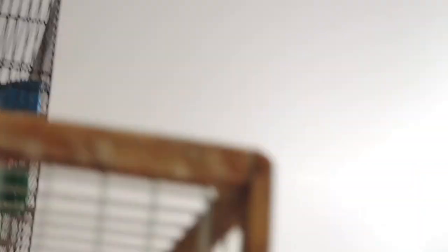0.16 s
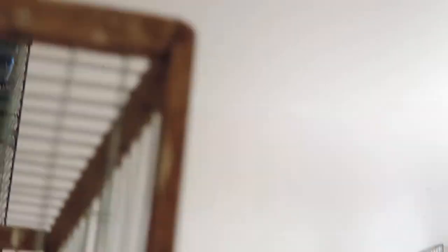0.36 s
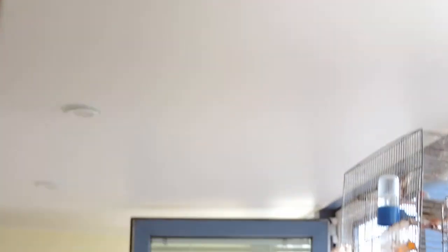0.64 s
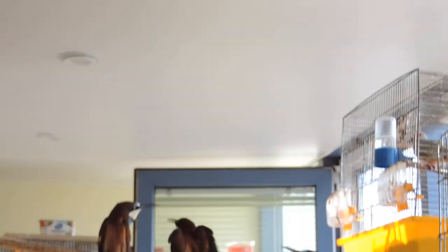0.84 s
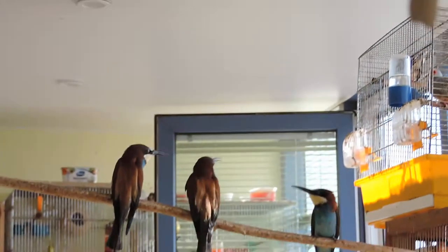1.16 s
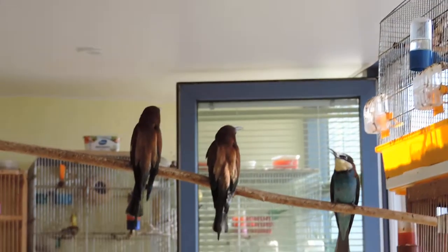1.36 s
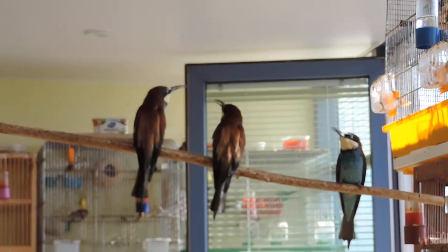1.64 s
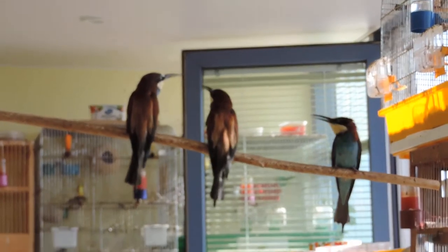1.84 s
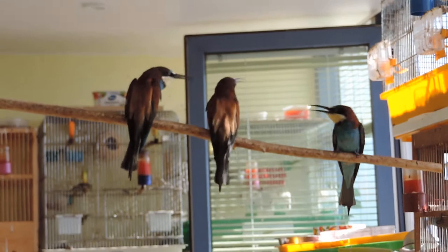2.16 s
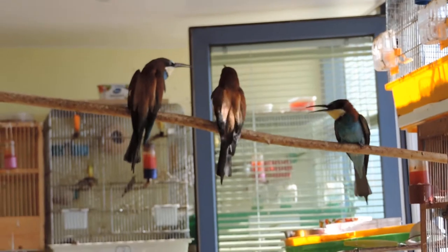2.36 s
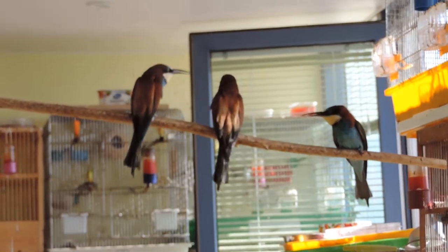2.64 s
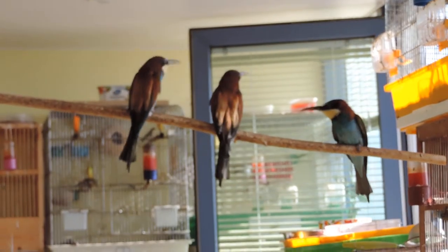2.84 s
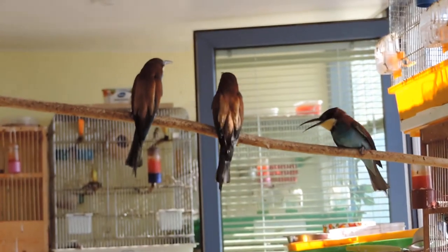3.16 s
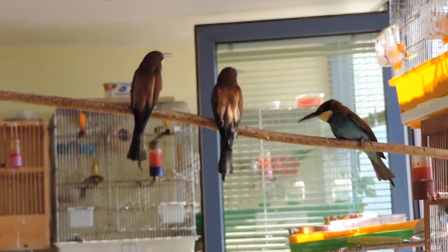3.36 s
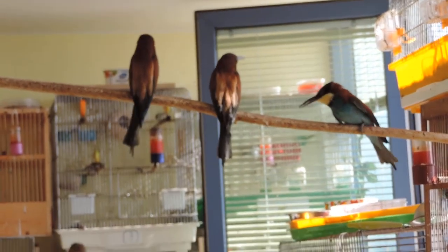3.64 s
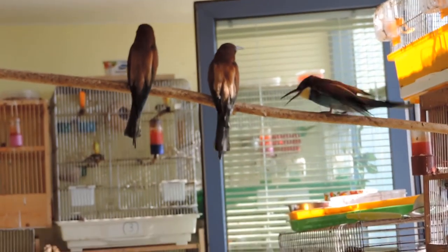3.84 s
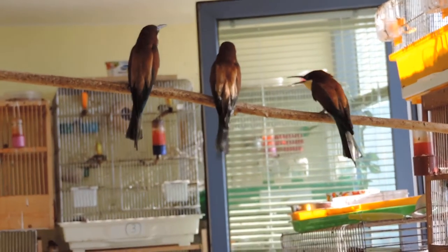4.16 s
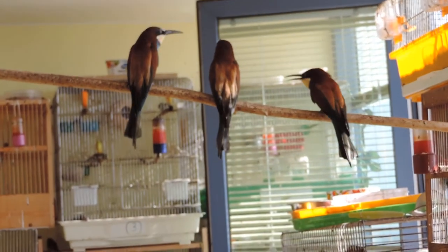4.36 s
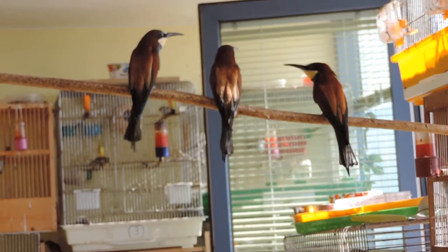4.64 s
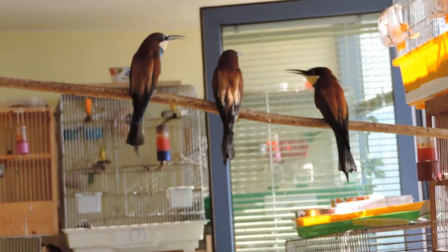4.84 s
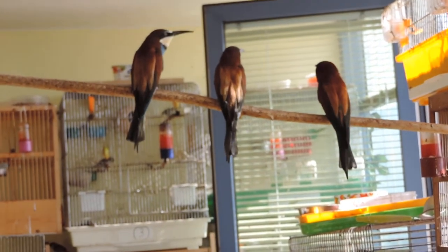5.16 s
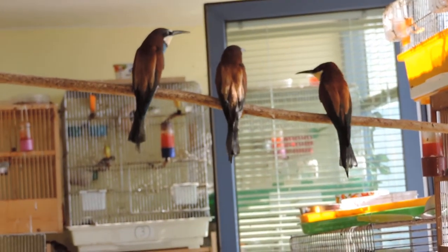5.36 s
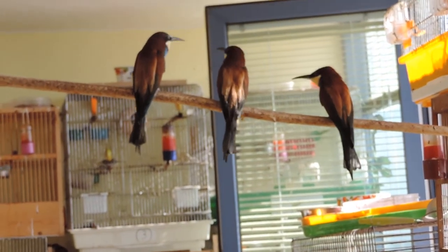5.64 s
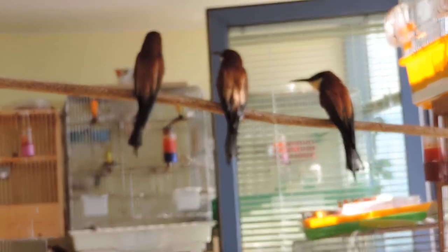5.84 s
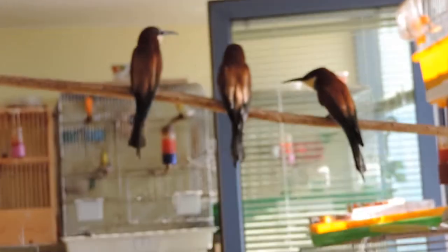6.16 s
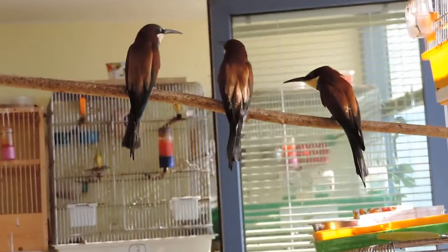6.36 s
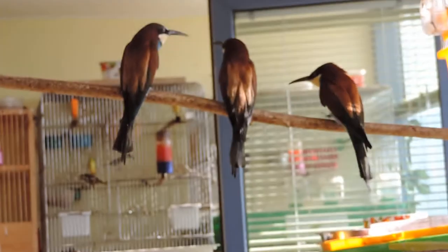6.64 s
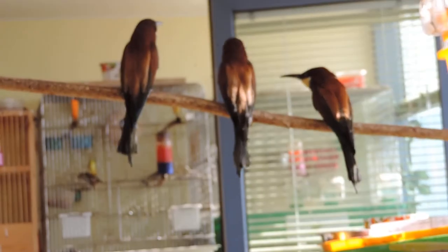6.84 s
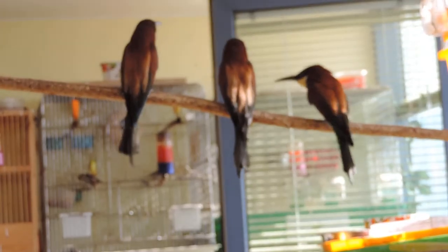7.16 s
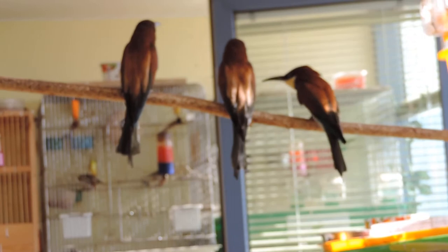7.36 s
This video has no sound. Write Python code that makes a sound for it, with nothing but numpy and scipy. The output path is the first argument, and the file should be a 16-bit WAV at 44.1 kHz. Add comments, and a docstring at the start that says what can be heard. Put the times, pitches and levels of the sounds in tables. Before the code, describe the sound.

Several bee-eaters call close by in a small, lightly echoing room. Short, throaty rolled "prrup" notes run throughout, mixed with quick upward chatter and small pips, densest in the first four seconds. Low soft purrs slip between them. Fainter caged birds chip and whistle thinly to the left, over steady ventilation. Calls grow sparser later, with a brief chatter burst near the end. Stereo microphones in the room.

```python
"""Rolling "prrup" calls of bee-eaters on a perch in a small bird room, mixed with rising chatter and low purrs.
Calls are two beating voices with a rasp, chatter is gliding tones, purrs are throbbing tones. Caged birds
whistle, buzz and chip (gliding sines); wing flutter and wire ticks are shaped noise. Scattered reflections give
a short room tail, over ventilation: filtered noise with low resonances."""
import sys
import numpy as np
from scipy import signal
from scipy.fft import rfft, irfft
from scipy.io import wavfile

SR = 44100
rng = np.random.default_rng(int(sys.argv[2]) if len(sys.argv) > 2 else 0)


def dump_mix(stems):
    """Bounce the given channels to the path in sys.argv[1] as a 16-bit WAV at rate SR."""
    frames = np.atleast_2d(stems).T  # one column per channel
    limited = np.clip(frames, -1, 1)  # hard clip at full scale
    pcm = np.round(limited * 32767).astype(np.int16)
    wavfile.write(sys.argv[1], SR, pcm)


N = 331191

# Levels are relative: mix gains follow.
# rolling calls: start_s, length_s, lower_voice_base_hz, level_db
ROLL_CALLS = [(.04, 0.076, 1982, -27.5), (0.238, 0.097, 1950, -31), (0.355, 0.077, 1970, -27),
              (0.601, 0.079, 2010, -26.5), (0.685, 0.099, 1945, -27.5), (0.792, 0.097, 1917, -24),
              (1.218, 0.087, 1932, -27), (1.288, 0.072, 1979, -26), (1.461, 0.08, 1945, -28),
              (1.524, .11, 1989, -28), (1.646, 0.1, 1853, -31), (1.924, 0.062, 1857, -29),
              (1.966, .08, 2014, -27.5), (2.195, 0.09, 1979, -28), (2.275, 0.078, 1920, -31),
              (2.433, .085, 1845, -30.5), (2.746, 0.09, 1912, -25.5), (2.825, 0.08, 2022, -25),
              (2.896, 0.11, 1887, -26), (3.013, .11, 1890, -26.5), (3.334, .12, 1894, -26),
              (3.523, .12, 1879, -26), (3.892, 0.11, 1895, -28.5), (3.979, .075, 1872, -30.5),
              (4.164, .11, 1782, -26.5), (4.527, 0.08, 1997, -25.5), (4.836, 0.12, 1945, -25.5),
              (4.996, .081, 1852, -31.5), (5.23, .11, 1923, -29), (5.842, .11, 1881, -27.5),
              (6.006, .11, 1918, -28), (6.306, .11, 1718, -32.5), (6.55, 0.075, 1980, -26),
              (6.993, 0.076, 1840, -32.5), (7.115, .125, 1910, -30), (7.356, .11, 1732, -29)]
# upper voice over lower, before its fade: call_base_hz, upper_over_lower_db
VOICE_BALANCE = [(1690, 1.5), (1880, -1.5), (1950, -9), (2010, -12)]
# rising chatter notes: start_s, length_s, level_db
CHATTER_NOTES = [(0.922, .039, -21), (0.975, .06, -25), (1.067, .059, -27.5), (1.142, 0.055, -26.5),
                 (1.333, .025, -20), (1.416, 0.038, -29), (1.574, 0.038, -26), (1.759, 0.044, -30),
                 (1.829, .055, -26.5), (2.008, .039, -25), (2.082, 0.065, -27), (2.273, .041, -22),
                 (2.391, 0.029, -31), (2.478, .03, -29), (2.568, 0.033, -29), (2.658, .065, -24),
                 (3.103, 0.025, -31), (3.195, .03, -32), (3.27, 0.046, -31), (3.644, .05, -22),
                 (3.739, 0.027, -31.5), (3.828, 0.0277, -37), (4.098, .048, -29), (6.777, .072, -22),
                 (6.864, .056, -21)]
# slightly falling pips of a second bird: start_s, level_db
PIP_NOTES = [(1.014, -24.5), (1.086, -24.5), (1.176, -19.5), (1.714, -29.5), (2.165, -30), (2.33, -51),
             (2.405, -27.5), (2.51, -27), (2.546, -40), (2.6, -26.5), (3.16, -36), (4.3, -28.5),
             (4.372, -30), (6.761, -36)]
# how hard the chattering bird pushes: time_s, effort_db
CHATTER_EFFORT = [(.9, -14.5), (1.15, -10), (1.4, -9.5), (1.6, -2), (1.76, -10.5), (2.02, -2), (2.55, -1),
                  (2.67, -15), (3.1, 0.5), (3.83, -3.5), (4.1, -0.5), (6.8, -7.5)]
# overtone colour of calls and chatter: freq_hz, gain_db
RASP_COLOUR = [(2400, -39), (3000, 6.5), (3800, -2.5), (4800, 1), (6300, -2), (7500, -9.5), (9500, -4.5),
               (12000, -0.5), (13300, 0), (14200, -20)]
# low throbbing purrs: start_s, length_s, first_pitch_hz, last_pitch_hz, level_db
PURR_NOTES = [(0.398, .054, 1370, 1375, -37.5), (1.706, 0.07, 1452, 1432, -39.5),
              (2.531, 0.072, 1480, 1444, -40), (3.078, 0.12, 1350, 1366, -47),
              (3.791, 0.12, 1630, 1725, -42), (4.287, .092, 1577, 1383, -33.5),
              (4.615, 0.039, 1413, 1420, -40), (4.674, 0.137, 1493, 1628, -34),
              (5.586, 0.085, 1426, 1492, -39.5), (5.669, .1, 1594, 1440, -35.5),
              (6.453, 0.076, 1405, 1355, -38)]
# caged-bird notes: start_s, length_s, first_pitch_hz, last_pitch_hz, buzz_share_of_pitch, level_db
TWEET_NOTES = [(0.398, 0.13, 6040, 5350, 0.13, -71), (1.604, 0.066, 4630, 5650, 0.097, -57),
               (2.364, 0.085, 4860, 4200, .012, -52), (2.649, 0.074, 3440, 3482, 0.0095, -46),
               (2.794, .07, 4910, 4490, .012, -50.5), (2.877, 0.0267, 4700, 5400, 0.0094, -51),
               (3.144, 0.16, 2800, 2604, 0.045, -53.5), (3.113, 0.0316, 6440, 5900, .036, -57),
               (3.154, 0.035, 3620, 3836, .006, -42.5), (3.743, 0.02, 2750, 2700, .03, -46.5),
               (3.8, 0.014, 3380, 3460, .02, -49), (3.994, 0.034, 4830, 4930, 0.084, -56.5),
               (4.094, 0.022, 3600, 3290, 0.063, -46), (4.192, 0.059, 7360, 7280, .006, -53),
               (4.768, .06, 5210, 4840, .006, -58), (4.828, 0.045, 6320, 5260, 0.011, -47),
               (4.992, 0.094, 4340, 4200, 0.058, -60.5), (5.116, 0.058, 4440, 6700, 0.089, -59),
               (5.336, .17, 5680, 4040, .1, -60.5), (5.646, 0.071, 7230, 7060, 0.029, -53.5),
               (5.803, .12, 6470, 5110, 0.14, -69), (6.016, 0.052, 4190, 6180, .034, -56.5),
               (6.16, 0.24, 4290, 4520, .015, -73), (6.418, 0.063, 5190, 5380, .008, -62.5),
               (6.508, 0.033, 5410, 5720, 0.029, -51.5), (6.514, 0.016, 6570, 7000, 0.021, -61),
               (6.667, 0.13, 8980, 9130, .022, -58.5), (7.307, 0.062, 3960, 5820, 0.07, -56.5)]
# centre of the random chip level of the far cages: time_s, level_db
TWITTER_LEVEL = [(0, -95.5), (1.35, -73), (1.47, -54.5), (1.9, -62), (2.3, -52), (3.2, -56.5),
                 (3.45, -61.5), (3.9, -50), (4.6, -73.5), (5.4, -72), (6.2, -101), (6.5, -61), (7.5, -77)]
# grainy noise puffs of wing flutter: start_s, length_s, level_db
NOISE_PUFFS = [(.342, 0.055, -54), (.843, 0.075, -54), (3.084, 0.028, -43), (3.779, 0.06, -48),
               (4.01, 0.13, -49), (4.114, .065, -37.5), (4.199, 0.28, -49.5), (4.36, 0.12, -50),
               (4.44, 0.31, -50.5)]
# puff noise colour: freq_hz, gain_db
PUFF_COLOUR = [(800, -4.5), (2000, 2.5), (3500, 8.5), (5000, 5), (7500, -12.5), (12500, -11), (14200, -21)]
# ticks on the cage wire: start_s, level_db
WIRE_TICKS = [(0.464, -31), (0.7724, -25), (6.7624, -55)]
# wire colour: freq_hz, gain_db
WIRE_COLOUR = [(1500, -15), (4000, -32), (7000, -13), (10000, 0.5), (13000, -4.5), (15500, -29)]
# moving-air colour: freq_hz, gain_db
AIR_COLOUR = [(12, -56), (20, 3.5), (157, -0.5), (324, -3.5), (932, -3), (1410, -2.5), (2330, -13.5),
              (2920, -21.5), (4430, -25.5), (6720, -34), (7310, -37), (8880, -28.5), (9660, -40.5),
              (13100, -30.5), (15500, -62.5)]
# background strength about its mean row: time_s, level_db
AIR_SWELL = [(0, 5), (1.2, 6), (1.8, 3.5), (2.4, 2.5), (2.8, 6.5), (3.6, 2), (4.3, 5.5), (5.2, 2.5),
             (7.5, 2.5)]
# fan hum resonances: centre_hz, width_hz, level_db
FAN_HUM = [(24.6, 8, -56), (131.3, 19, -58), (143, 18, -65.5), (228.7, 28.7, -53.5)]
# room decay: freq_hz, t60_s
ROOM_DECAY = [(500, 0.12), (2000, 0.2), (5000, 0.23), (9000, 0.29), (15000, 0.055)]
# left-right likeness of diffuse sound: freq_hz, correlation
LIKENESS = [(25, 0.83), (200, 0.98), (600, 0.97), (1200, 0.78), (2000, 0.56), (4000, -0.14), (8000, 0.45),
            (15000, 0.3)]

EDGE_HZ = 15650
PITCH_JITTER = 0.008  # share of pitch
UPPER_RATIO = 1.29  # upper voice over call base pitch, before sink and swing
ENTRY_S, ENTRY_GROWTH = 0.027, 1.345  # upper voice entry in a 0.1 s call; exponent on length
CLIMB_TO_HZ, CLIMB_HZ_PER_DB = 2261, 6  # chatter end pitch at effort 0 dB; rise with effort
CLIMB_HZ_PER_S = 8600  # same mean climb for every note, so long ones start low
CHATTER_RASP_DB = -45.5  # at effort 0 dB
PIP_S, PIP_FIRST_HZ, PIP_LAST_HZ, PIP_RASP_DB = 0.035, 1938, 1868, -50  # rasp at effort 0 dB
THROBS_PER_S = 51.5
CHIPS_PER_S = 20
CHIP_LOW_HZ, CHIP_RANGE = 3100, 1.25  # lowest base pitch; highest over lowest
CHIP_S, CHIP_EXTRA_S = 0.016, 0.051  # shortest length; spread of lengths


def amp(db):
    """Turns decibels into an amplitude factor."""
    return 10 ** (np.asarray(db) / 20)


def unit(x):
    """Scales to rms 1."""
    return x / np.sqrt(np.mean(x ** 2) + 1e-20)


def read(points, hz):
    """Joins rows (Hz, value) by straight lines on a log-frequency axis."""
    f, value = np.transpose(points)
    return np.interp(np.log(hz + 1), np.log(f + 1), value)


def at(curve, s):
    """Joins rows (s, value) by straight lines in time."""
    return np.interp(s, *np.transpose(curve))


def add(mix, start_s, sound):
    """Adds a sound into the mix in place, cut at its end."""
    part = mix[max(round(start_s * SR), 0):][:len(sound)]
    part += sound[:len(part)]


def time_axis(length_s):
    """Sample times in seconds."""
    return np.arange(0, length_s, 1 / SR)


def colour(x, points):
    """Filters by a spectrum of (Hz, dB) rows."""
    n = x.shape[-1]
    return irfft(rfft(x) * amp(read(points, np.fft.rfftfreq(n, 1 / SR))), n)


def waver(t, hz):
    """Smooth random wander of rms about 1: 12 sines at 0.5 to 1.5 times hz."""
    speed, phase = rng.random((2, 12, 1))
    return np.sin(2 * np.pi * (hz * (0.5 + speed) * t + phase)).sum(0) / np.sqrt(6)


def gate(t, rise_s, fall_s):
    """Soft start and end of a note."""
    rise = np.sin(np.pi / 2 * np.clip(t / rise_s, 0, 1)) ** 2
    fall = np.sin(np.pi / 2 * np.clip((t[-1] - t) / fall_s, 0, 1)) ** 2
    return rise * fall


def turn(hz):
    """Integrates pitch into phase in radians."""
    return 2 * np.pi * np.cumsum(hz) / SR


def rolls(scoop=0.2335, scoop_s=0.008854, droop=0.2086, sink=0.2, swing=0.15, roll_hz=100,
          upper_fade_db=5, overtone_db=-34, depth=0.25, bright=0.16, lead=1.51):
    """Two sides of the syrinx: one sings an arch; the other cuts in above, warbles down and beats with it."""
    tones, overtones = np.zeros((2, N))
    for start_s, length_s, base_hz, level_db in ROLL_CALLS:
        t = time_axis(length_s)
        entry_s = ENTRY_S * (10 * length_s) ** ENTRY_GROWTH
        after = np.clip((t - entry_s) / (length_s - entry_s), 0, 1)
        both = np.clip((t - entry_s) / 0.003, 0, 1)
        # with both sides sounding, airflow throbs and pulls the upper pitch down each beat: the rolled "rr"
        roll_phase = turn(roll_hz * (1 + 0.23 * waver(t, 30.05))) + 2 * np.pi * rng.random()
        roll = both * np.sin(roll_phase)

        arch = 1 - scoop * np.exp(-t / scoop_s) - 0.02395 * (1 - both) - droop * after ** 4
        low_phase = turn(base_hz * arch * (1 + PITCH_JITTER * (1 + 3 * both) * waver(t, 180.7)))
        descent = 1 - sink * after - swing * (1 + roll) / 2
        high_phase = turn(UPPER_RATIO * base_hz * descent * (1 + PITCH_JITTER * waver(t, 47.3)))

        # the opening glide has the whole airflow to itself
        lower = np.sin(low_phase) * (lead * (1 - both) + both * (1 + 0.55 * waver(t, 42.7)))
        upper_db = read(VOICE_BALANCE, base_hz) + upper_fade_db * (1.5 - after) + 2 * waver(t, 40.4)
        upper = np.sin(high_phase) * both * amp(upper_db)
        shape = gate(t, 0.011, 0.012) * (1 + depth * roll)
        add(tones, start_s, amp(level_db) * unit((lower + upper) * shape))

        # cycle-to-cycle unevenness smears the overtones into a faint rasp
        rough = low_phase + 0.19 * waver(t, 320)
        edge = np.zeros(len(t))
        for k in range(2, 8):
            mixed = np.sin((k - 1) * rough + high_phase)
            edge += k ** bright * (np.sin(k * rough) + 0.63 * both * mixed)
        add(overtones, start_s, amp(level_db + overtone_db) * unit(edge * shape * (0.22 + both)))
    return tones, colour(overtones, RASP_COLOUR)


def chatter(bend=1.25, fray=0.027, half_db=-7, hiss_db=-14, flutter=0.53, smear=0.14, rasp_rise_s=0.0036):
    """Gliding notes that fray in pitch, with a rasp of overtones, weaker half lines and hiss."""
    tones, overtones = np.zeros((2, N))
    hiss = rng.standard_normal(N)
    for start_s, length_s, first_hz, last_hz, level_db, rasp_db in chatter_notes():
        t = time_axis(length_s)
        glide_hz = first_hz + (last_hz - first_hz) * np.sin(np.pi / 2 * t / length_s) ** bend
        jitter = PITCH_JITTER + fray * (t / length_s) ** 2
        phase = turn(glide_hz * (1 + jitter * waver(t, 240)))
        shape = gate(t, 0.0043, 0.029) * (1 + flutter * waver(t, 86.8))
        add(tones, start_s, amp(level_db) * unit(np.sin(phase) * shape))

        rough = turn(glide_hz) + smear * waver(t, 350)
        stack = unit(sum(np.sin(k * rough) + amp(half_db) * np.sin((k - 0.5) * rough) for k in range(2, 9)))
        stack += amp(hiss_db) * hiss[round(start_s * SR):][:len(t)]
        growth = np.minimum(t / rasp_rise_s, 1) * (0.3 + t / length_s)
        add(overtones, start_s, amp(rasp_db) * unit(stack * shape * growth))
    return tones, colour(overtones, RASP_COLOUR)


def chatter_notes():
    """Effort raises chatter pitch and all rasp: start_s, length_s, first_hz, last_hz, level_db, rasp_db."""
    for start_s, length_s, level_db in CHATTER_NOTES:
        effort_db = at(CHATTER_EFFORT, start_s)
        top_hz = CLIMB_TO_HZ + CLIMB_HZ_PER_DB * effort_db
        first_hz = top_hz - CLIMB_HZ_PER_S * length_s
        yield start_s, length_s, first_hz, top_hz, level_db, CHATTER_RASP_DB + effort_db
    for start_s, level_db in PIP_NOTES:
        rasp_db = PIP_RASP_DB + at(CHATTER_EFFORT, start_s)
        yield start_s, PIP_S, PIP_FIRST_HZ, PIP_LAST_HZ, level_db, rasp_db


def purrs(depth=0.66):
    """A soft low note, chopped into throbs that also sway its pitch."""
    out = np.zeros(N)
    for start_s, length_s, first_hz, last_hz, level_db in PURR_NOTES:
        t = time_axis(length_s)
        throb = -np.cos(turn(THROBS_PER_S * (1 + 0.25 * waver(t, 28))))
        sway = 1 + 0.019 * throb + 2 * PITCH_JITTER * waver(t, 130.7)
        tone = np.sin(turn(np.linspace(first_hz, last_hz, len(t)) * sway))
        shape = (1 + depth * throb) ** 2 * gate(t, 0.005, 0.0019)
        add(out, start_s, amp(level_db) * unit(tone * shape))
    return out


def tweets(buzz_hz=210, second_db=-15, jitter=0.01):
    """Thin gliding whistles; a fast warble of the pitch turns some into buzzes."""
    out, octave = np.zeros((2, N))
    for start_s, length_s, first_hz, last_hz, buzz, level_db in TWEET_NOTES:
        t = time_axis(length_s)
        warble = np.sin(turn(buzz_hz * (1 + 0.037 * waver(t, 100))))
        glide_hz = np.linspace(first_hz, last_hz, len(t))
        phase = turn(glide_hz * (1 + buzz * warble + jitter * waver(t, 150)))
        shape = amp(level_db) * unit(gate(t, 0.0067, 0.01))
        add(out, start_s, shape * unit(np.sin(phase)))
        add(octave, start_s, shape * unit(np.sin(2 * phase)))
    # the octave shows more on higher notes
    return out + amp(second_db) * colour(octave, [(7500, -15), (9500, 0.0), (12500, 2.0), (15000, 1)])


def twitter(spread_db=4, glide=0.13, quaver=0.028):
    """Far cages: a stream of faint, quavering chips, gliding up or down at random."""
    out = np.zeros(N)
    draws = rng.random((CHIPS_PER_S * N // SR, 5))
    for k, (when, size, pitch, slope, long) in enumerate(draws):
        start_s = (k + when) / CHIPS_PER_S
        t = time_axis(CHIP_S + CHIP_EXTRA_S * long)
        bend = 1 + glide * (2 * slope - 1) * t / t[-1] + quaver * waver(t, 200)
        hz = CHIP_LOW_HZ * CHIP_RANGE ** pitch * bend
        chip = unit(np.sin(turn(hz)) * gate(t, 0.006, 0.012))
        add(out, start_s, amp(at(TWITTER_LEVEL, start_s) + spread_db * (2 * size - 1)) * chip)
    return out


def noise_puffs(grain_db=6.5, swell_share=0.083):
    """Wing flutter: grainy noise puffs that swell and die away."""
    out = np.zeros(N)
    noise = unit(colour(rng.standard_normal(N), PUFF_COLOUR))
    for start_s, length_s, level_db in NOISE_PUFFS:
        t = time_axis(length_s)
        puff = gate(t, swell_share * length_s, length_s / 2) * amp(grain_db * waver(t, 120.0))
        add(out, start_s, amp(level_db) * unit(noise[round(start_s * SR):][:len(t)] * puff))
    return out


def ticks(decay_s=0.0034):
    """Dry decaying noise snaps, as of a bill or claw on thin wire."""
    out, t = np.zeros(N), np.arange(1000) / SR
    for start_s, level_db in WIRE_TICKS:
        snap = rng.standard_normal(len(t)) * np.exp(-t / decay_s) * gate(t, 0.002, 0.004)
        add(out, start_s, amp(level_db) * snap)
    return colour(out, WIRE_COLOUR)


def pair(x):
    """Makes two unrelated signals as alike as a diffuse field is at two close points."""
    n = x.shape[-1]
    a, b = rfft(x)
    same = np.clip(read(LIKENESS, np.fft.rfftfreq(n, 1 / SR)), -1, 1)
    mid, side = a * np.sqrt((1 + same) / 2), b * np.sqrt((1 - same) / 2)
    return irfft(np.array([mid + side, mid - side]), n)


def room(x, wet_db, lag_ms, pan_db, build_s=0.003):
    """Direct sound plus scattered reflections with a decay set by frequency; pan is left over right."""
    t = np.arange(SR // 2) / SR
    sparse = rng.choice([-1., 1.], (2, len(t))) * (rng.random((2, len(t))) < 2500 / SR)
    taps = sparse * np.clip(t / build_s, 0, 1) ** 2
    hz, when_s, z = signal.stft(pair(taps), SR, nperseg=256)
    decay = amp(-60 * when_s / read(ROOM_DECAY, hz)[:, None])
    tail = signal.istft(z * decay, SR, nperseg=256)[1]
    tail = tail / np.sqrt((tail ** 2).sum() / 2)
    wet = signal.fftconvolve(x[None], tail, axes=1)[:, :N]
    # the right side hears the direct sound later
    late = np.interp(np.arange(N) - round(lag_ms * SR / 1000), np.arange(N), x)
    direct = np.array([x * amp(pan_db / 2), late * amp(-pan_db / 2)])
    return (direct + amp(wet_db) * wet) / np.sqrt(1 + amp(wet_db) ** 2)


def ventilation(air_db=-46.5, hum_db=-1):
    """A wash of moving air with a few broad low resonances, swelling slowly."""
    hz = np.fft.rfftfreq(N, 1 / SR)
    air = amp(air_db) * unit(pair(colour(rng.standard_normal((2, N)), AIR_COLOUR)))
    noise = rfft(rng.standard_normal(N))
    hum = np.zeros(N)
    for centre_hz, width_hz, level_db in FAN_HUM:
        resonance = irfft(noise / (1 + (2 * (hz - centre_hz) / width_hz) ** 2), N)
        hum += amp(level_db + hum_db) * unit(resonance)
    s, db = np.transpose(AIR_SWELL)
    swell_db = np.interp(np.arange(N) / SR, s, db - db.mean())
    return (air + hum) * amp(swell_db) * amp([[-0.4], [0.4]])


def scene():
    """Bee-eater tones lean right, cages further off on the left, over ventilation."""
    roll_tones, roll_rasp = rolls()
    chatter_tones, chatter_rasp = chatter()
    perch = room(amp(4.5) * roll_tones, wet_db=1.0, lag_ms=0.02, pan_db=-3.4)
    perch += room(chatter_tones, wet_db=2.5, lag_ms=0.058, pan_db=-4)
    # the bills point away, so the rasp arrives mostly by way of the walls
    perch += room(amp(4.5) * roll_rasp + chatter_rasp, wet_db=7, lag_ms=0.05, pan_db=5)
    perch += room(purrs(), wet_db=-6, lag_ms=0.02, pan_db=-5.0)
    cages = amp(7) * room(tweets() + twitter(), wet_db=4.5, lag_ms=0.12, pan_db=11.5)
    noises = room(noise_puffs(), wet_db=7.5, lag_ms=0.09, pan_db=-2.0)
    noises += amp(0.5) * room(ticks(), wet_db=-6.0, lag_ms=0.05, pan_db=10)
    return perch + cages + noises + ventilation()


def record(dry):
    """Steep linear-phase low-pass at EDGE_HZ."""
    lowpass = signal.firwin(511, EDGE_HZ, window=("kaiser", 9), fs=SR)
    return signal.oaconvolve(dry, lowpass[None], "same")


dry = scene()
out = record(dry)
dump_mix(out)
```